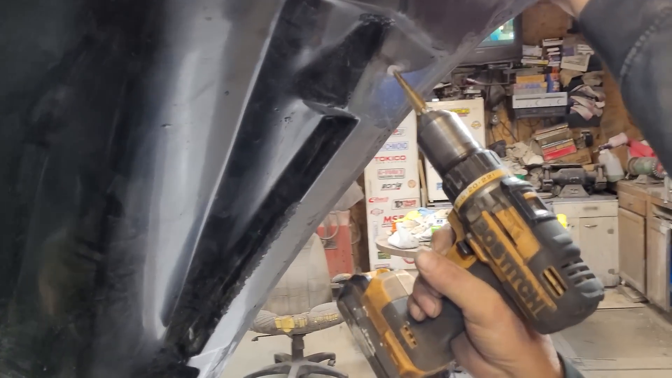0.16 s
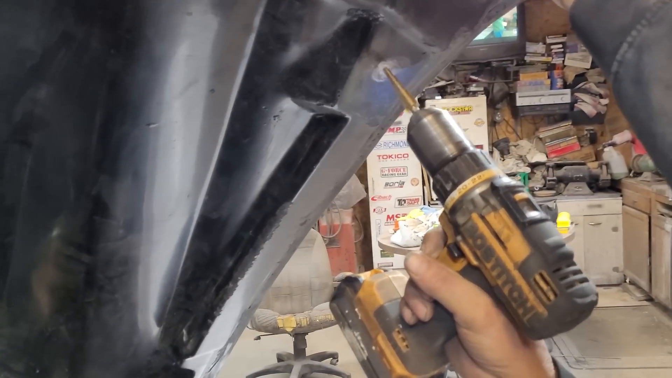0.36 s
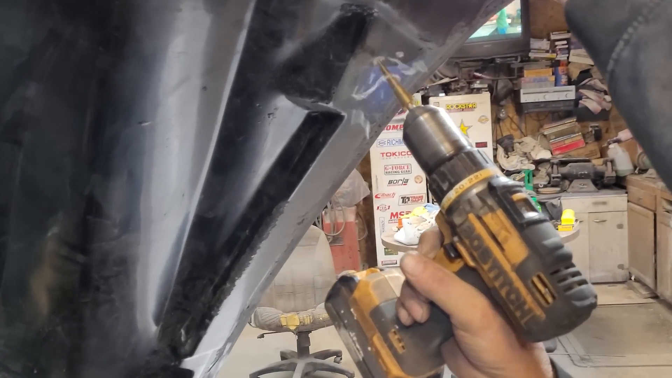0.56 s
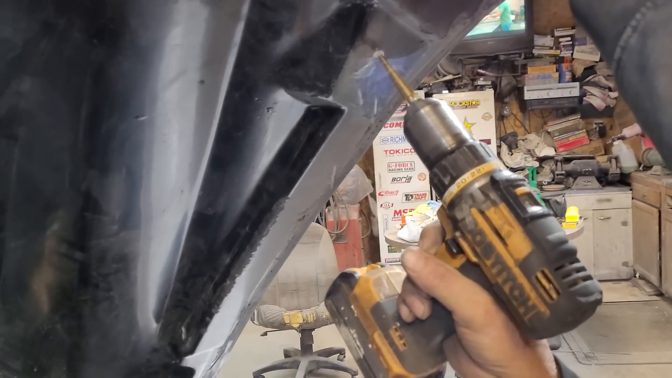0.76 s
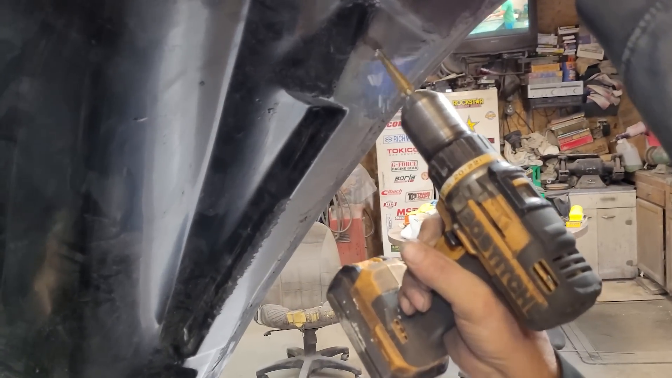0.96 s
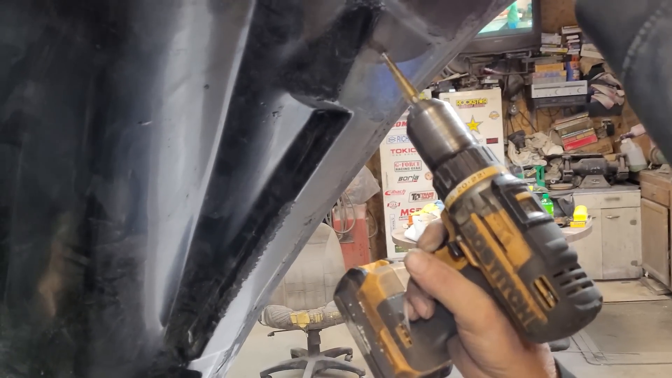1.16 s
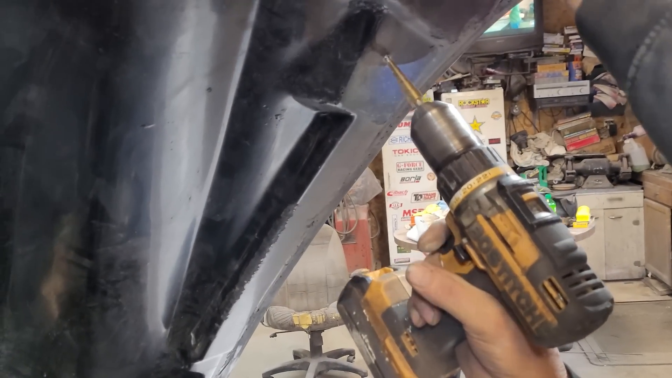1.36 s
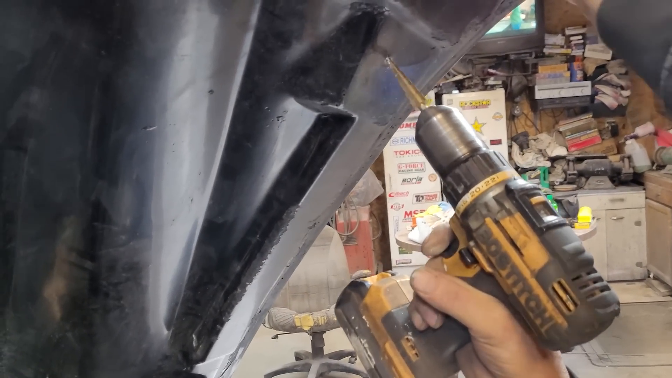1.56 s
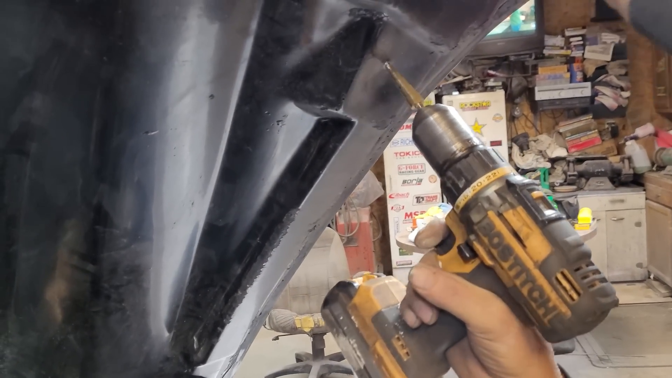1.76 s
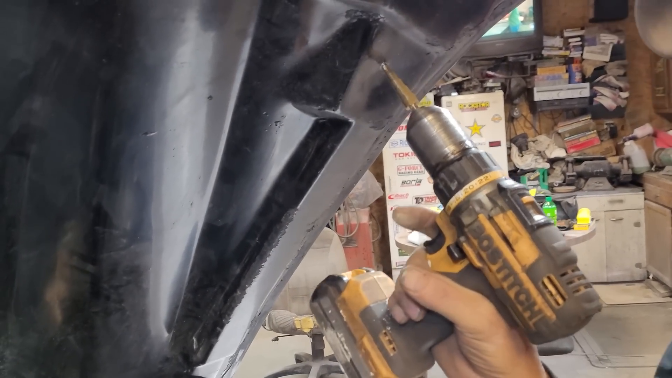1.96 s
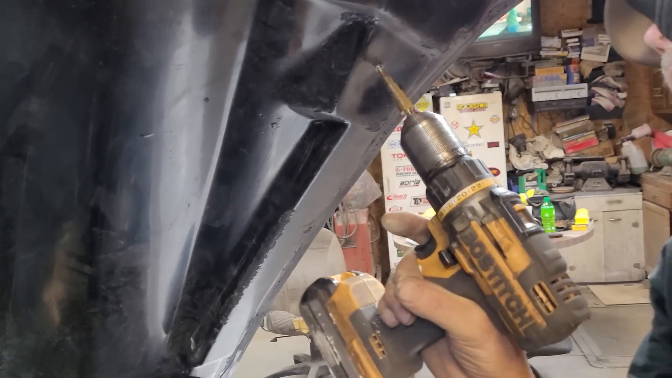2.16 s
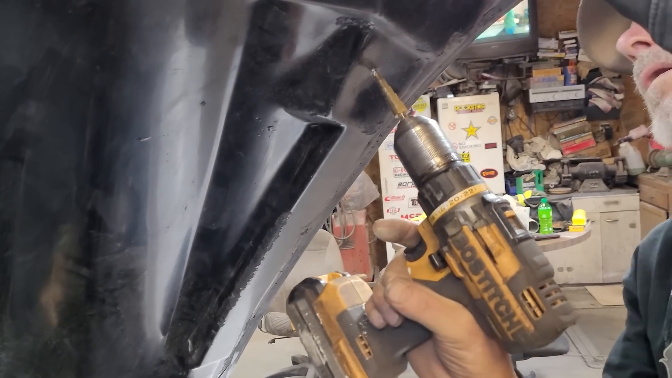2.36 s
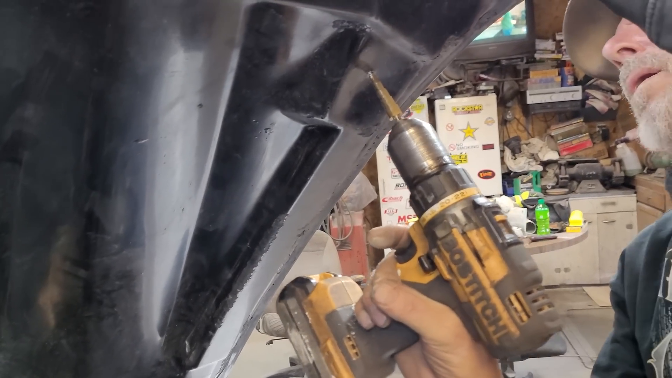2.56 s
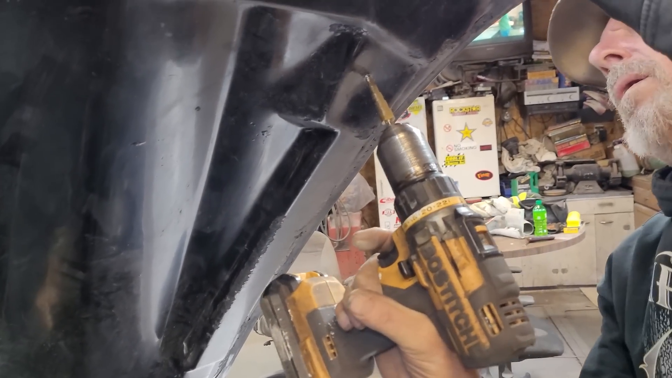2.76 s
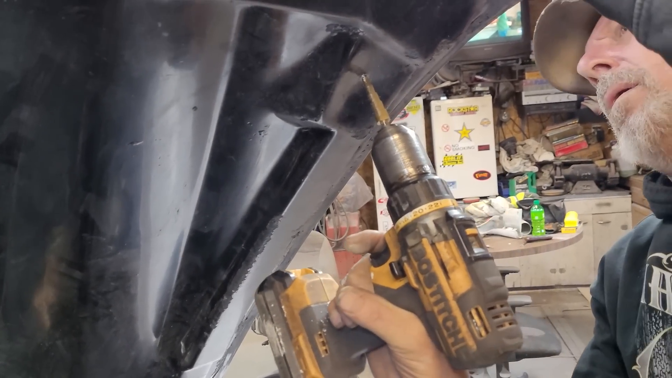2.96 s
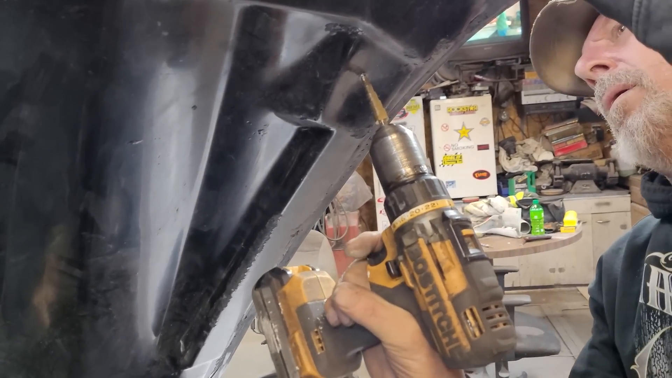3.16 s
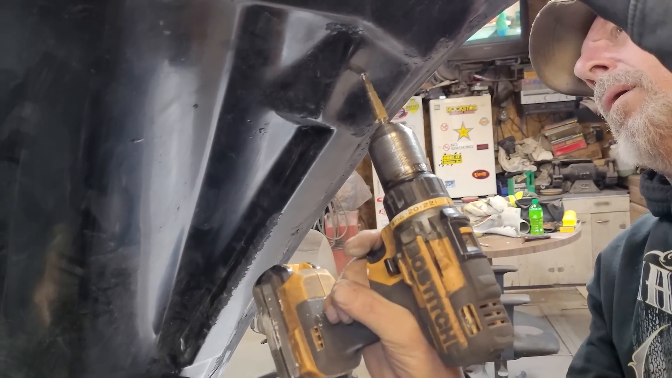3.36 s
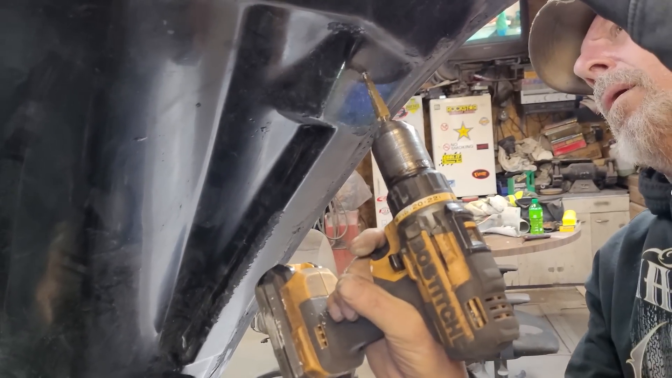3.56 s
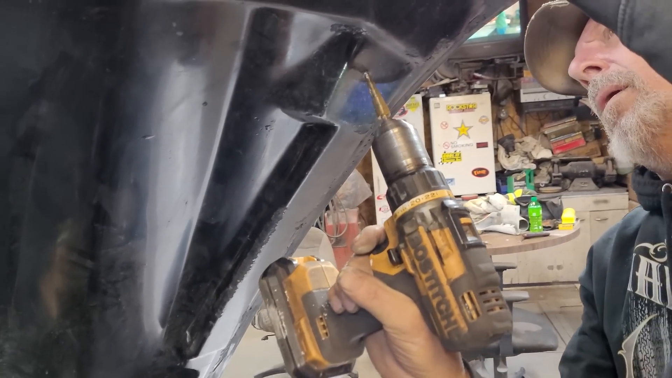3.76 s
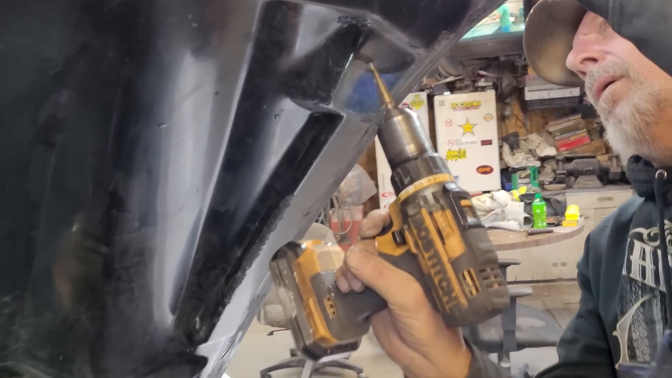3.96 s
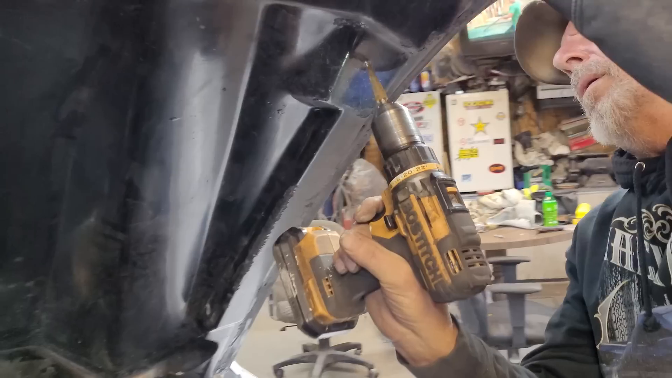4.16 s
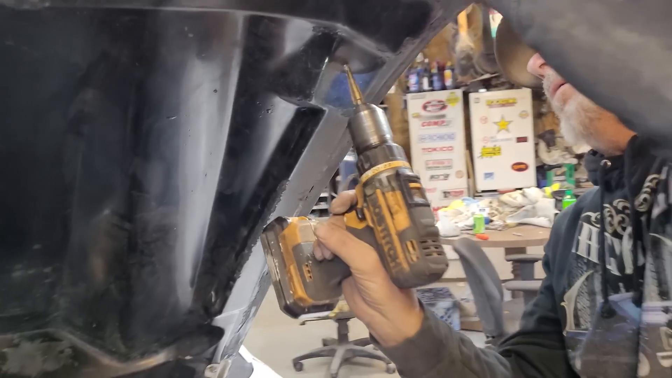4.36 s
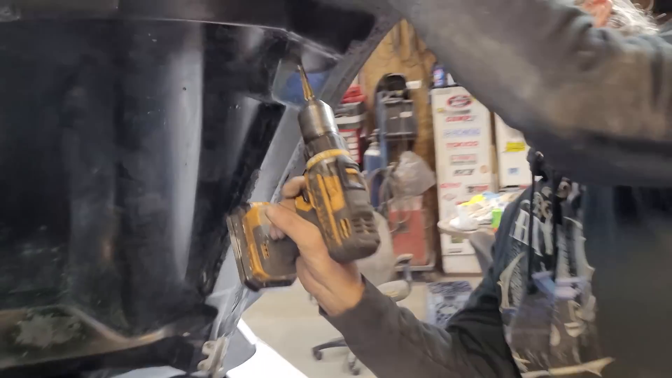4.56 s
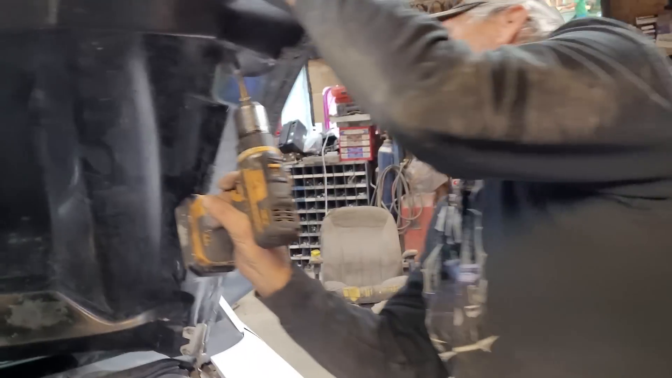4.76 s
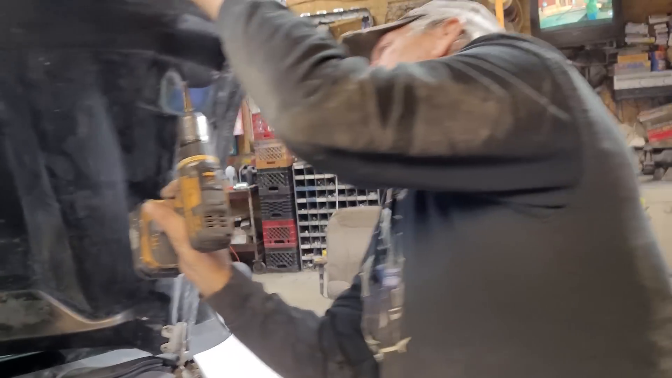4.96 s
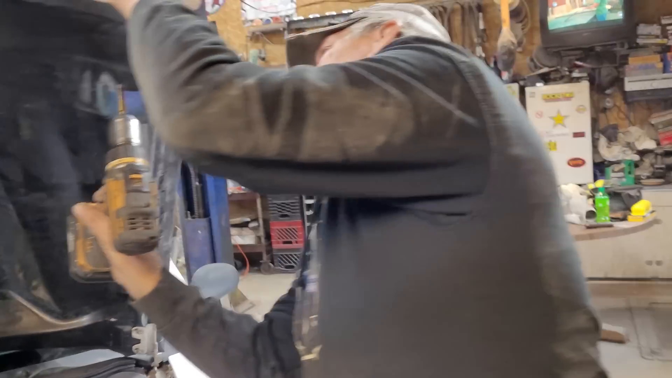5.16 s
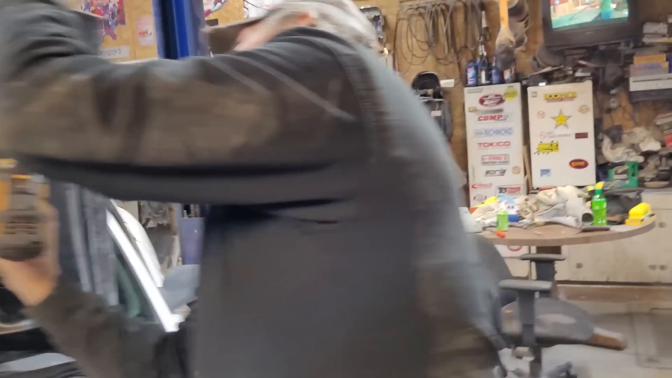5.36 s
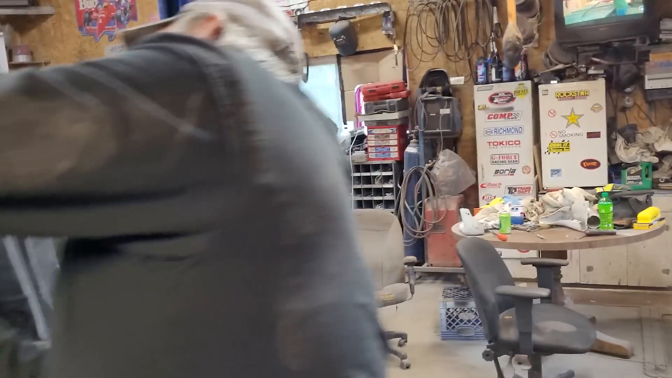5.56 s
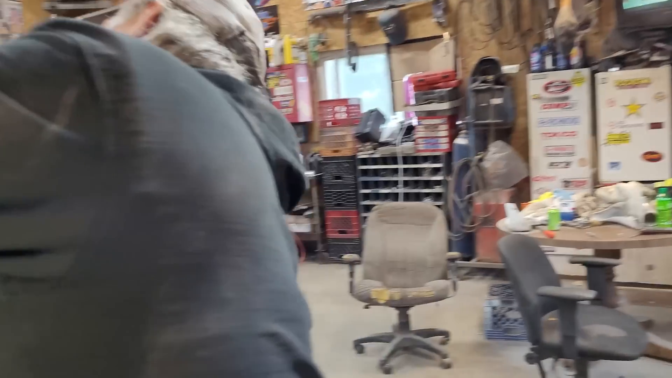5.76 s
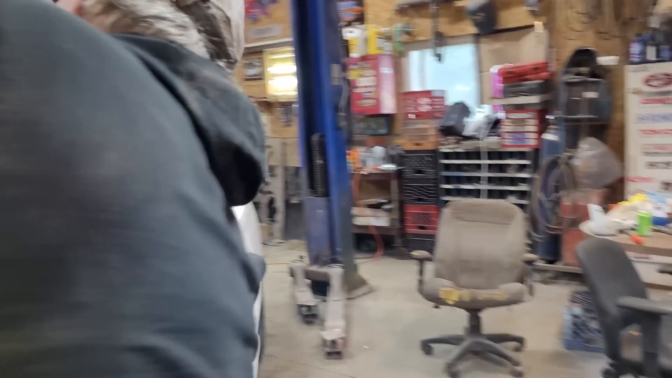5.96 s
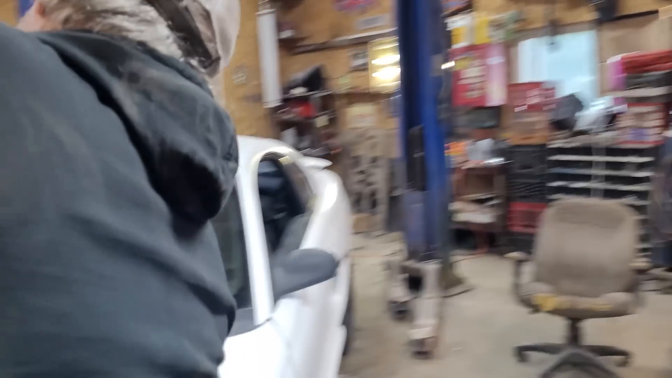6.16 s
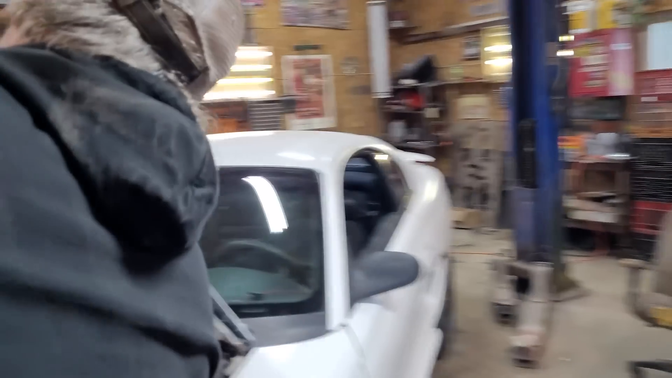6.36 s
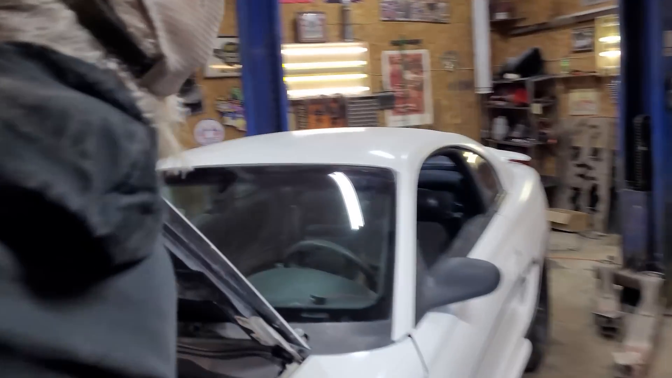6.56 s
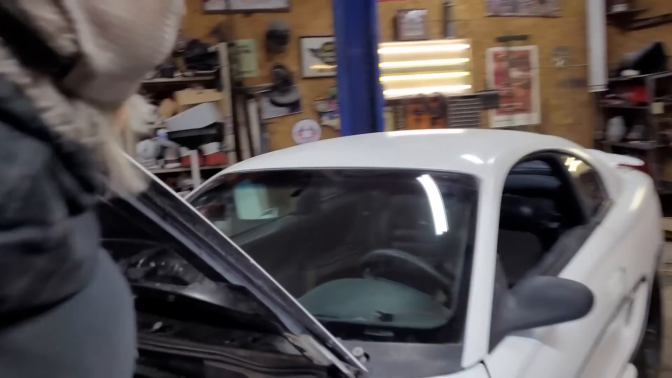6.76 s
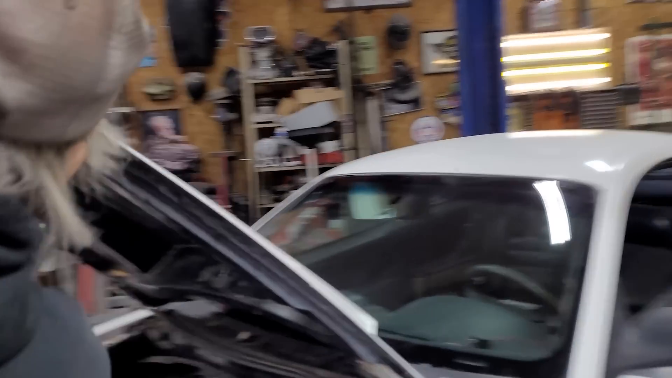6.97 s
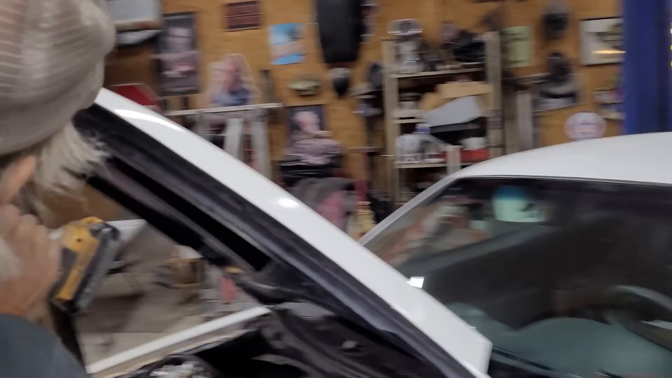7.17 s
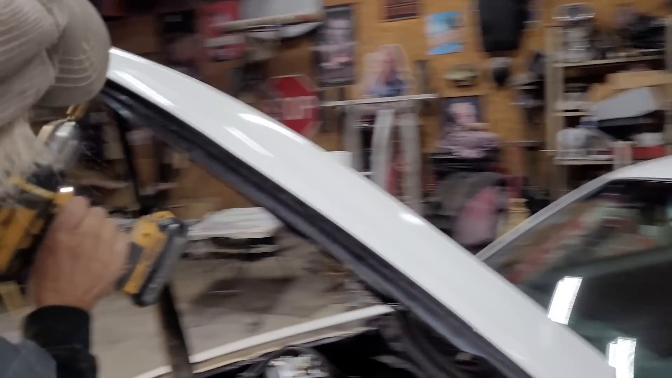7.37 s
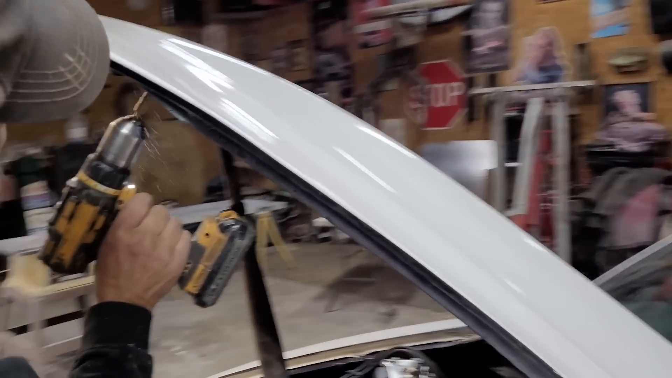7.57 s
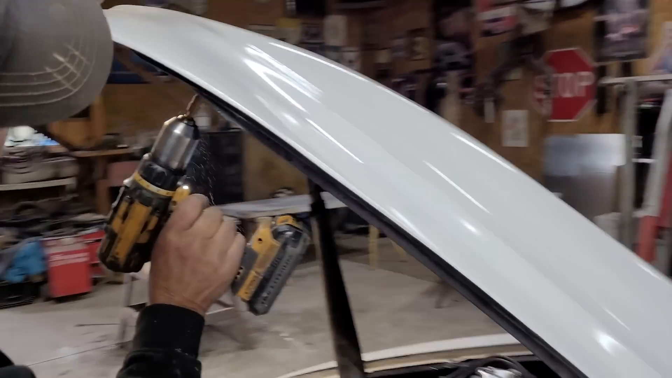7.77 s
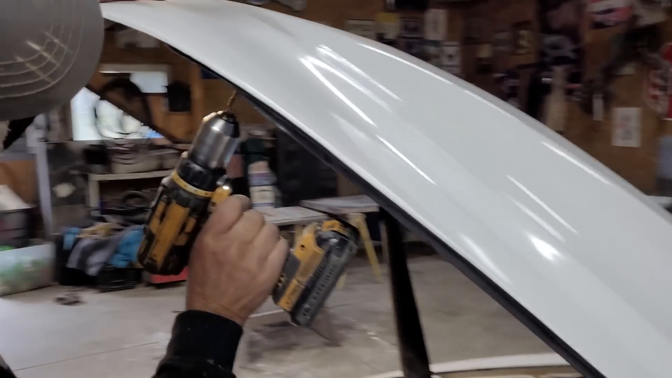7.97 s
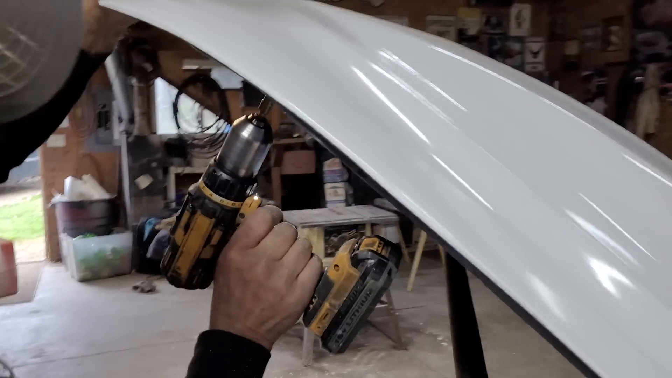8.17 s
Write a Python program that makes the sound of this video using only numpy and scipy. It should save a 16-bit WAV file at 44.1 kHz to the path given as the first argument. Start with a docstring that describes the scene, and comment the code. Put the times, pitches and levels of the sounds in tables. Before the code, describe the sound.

A cordless drill runs at full speed close by in a workshop, its motor and gears whining and hissing while the bit scrapes a steel car hood and sets it droning. Small crunches come near 1 second. From 1.2 seconds the drill winds down, with sharp metallic clacks and panel thumps until about 2 seconds. A quiet stretch follows, with faint scuffs, sleeve rustle, shuffling and a tiny squeak around 3 seconds. At 3.8 seconds the drill restarts slowly with a thin, high electronic tone, the bit rasping and catching. It reaches full speed by 5.5 seconds, and the drone changes colour while the hiss softens as the microphone moves around the car. At 7.6 seconds the bit breaks through with a clack and a short boom, then rubs and chatters in the open hole, still spinning just past 8 seconds.

```python
"""A cordless drill bores holes in the steel hood of a car, close by, in a workshop.
Motor and gears whine, fan and brushes hiss; the bit's two lips scrape the sheet and set it droning.
From 1.2 s the drill runs down with clacks and thumps; faint scuffs, rustling and a squeak follow.
At 3.8 s it restarts slowly, speed control singing, and is at full speed by 5.5 s; the listener walks
round the car. At 7.6 s the bit breaks through with a boom, then rubs and chatters in the open hole."""
import sys
import numpy as np
from scipy import signal
from scipy.fft import rfft, irfft, next_fast_len
from scipy.io import wavfile
from scipy.ndimage import uniform_filter1d

SR = 44100
rng = np.random.default_rng(int(sys.argv[2]) if len(sys.argv) > 2 else 0)


def to_wav(sig):
    """Store sig (one row per channel, or 1-D mono) as 16-bit WAV at the path in sys.argv[1].

    Samples outside -1..1 are clipped; the rate is SR.
    """
    pcm = np.clip(np.atleast_2d(sig), -1, 1) * 32767
    pcm = np.round(pcm).astype(np.int16)
    wavfile.write(sys.argv[1], SR, pcm.T)  # frames by channels


N = 362943
T = np.arange(N) / SR
FULL_WHINE_HZ, WHINE_ORDER, WHINE_CYCLES_PER_LIP = 3900, 12, 90.45
LIP_RASP_DB = 3

# Resonances (frequency [Hz], width [Hz], level [dB])
PANEL_MODES = [(45, 8.9, -14.5), (73.5, 8.4, 0.5), (109.8, 6, 0)]  # whole panel flexing
HOOD_MODES = [(134.8, 2.5, -6), (168.3, 4.2, 1), (211.5, 34, -5), (241, 13, 1.5), (259.4, 12, 9.5),
              (296.4, 24, -1), (324, 10, -3), (392, 3.5, 1.5), (471, 42, -16)]
RIM_MODES = [(510, 43, -5), (534, 39, -5), (577, 9.7, 8), (652, 31, 2.5), (698, 8.5, -6), (770, 32, 1),
             (850, 20, -7), (1055, 12, 4.5)]  # steel round the hole
CHUCK_MODES = [(1450, 30.1, -9), (1543, 24, 3.5), (1734, 16, 0), (1900, 20, 0.5), (2040, 39, 0),
               (2410, 79, -3)]  # bit and chuck
# Noise spectra (frequency [Hz], density [dB])
GEAR_SPECTRUM = [(760, -23.5), (1300, -5), (1470, 1), (1940, 3.5), (3280, -1), (3990, -1.5), (4290, -11),
                 (4600, -24), (5980, -42.5), (10100, -120)]
SCRAPE_SPECTRUM = [(500, -0.5), (700, -1.5), (950, -4), (1200, -0.5), (1500, 0)]
CLACK_SPECTRUM = [(250, -7.5), (420, -8.5), (660, -1), (1100, -8.5), (1450, -5.5), (2200, -5.5),
                  (3000, -9.5), (4200, -12), (6400, -18), (8000, -16), (10000, -22.5), (16000, -12)]
# Aim of the vents (time [s], leftward aim [dB])
VENT_AIM = [(0, 0.5), (1.5, 4.5), (1.7, 4), (4.2, 3), (5.1, 9.5), (5.4, 11), (6.0, 14.5), (7.3, 9.5),
            (8.23, 8.5)]
# Listener's walk (time [s], place [0 below, 1 behind, 2 beside, 3 ahead of the hood])
WALK = [(5.55, 0), (5.95, 1), (6.5, 1), (6.72, 2), (7.3, 2), (7.6, 3)]
# Effort on the second hole (time [s], push on the hood [dB], gear load [dB])
SECOND_HOLE = [(3.84, -45, -52), (3.89, -37.5, -39.5), (4.02, -24.5, -36), (4.55, -22.5, -38.5),
               (5.06, -26, -42), (5.42, -21, -38), (6.0, -27, -41), (7.2, -25.5, -38.5), (7.55, -27, -34.5),
               (7.7, -25, -39), (7.89, -31.5, -39), (8.23, -32, -37)]


def from_db(db):
    """Decibels to gain."""
    return 10 ** (np.asarray(db) / 20)


def unit_rms(x):
    """Scale the channel mean to rms 1."""
    return x / np.sqrt(np.mean(np.atleast_2d(x).mean(0) ** 2) + 1e-20)


def curves(rows):
    """Table columns as curves over time."""
    times_s, *columns = np.transpose(rows)
    return [np.interp(T, times_s, column) for column in columns]


def at_hz(points, hz):
    """Interpolate on a log-frequency axis."""
    points_hz, values = np.transpose(points)
    return np.interp(np.log(hz), np.log(points_hz), values)


def drift(rate_hz):
    """Smooth random curve, rms 1."""
    hop, warm_up = 40, 2000
    pole = np.exp(-2 * np.pi * hop * rate_hz / SR)
    white = rng.standard_normal(N // hop + warm_up + 2)
    slow = signal.lfilter([1], [1, -2 * pole, pole * pole], white)[warm_up:]
    return np.interp(np.arange(N) / hop, np.arange(len(slow)), unit_rms(slow))


def pan(left_db):
    """Stereo gains for a left-minus-right level."""
    return from_db(np.array([[.5], [-.5]]) * left_db)


def lowpass(x, hz, order=2):
    """Butterworth low-pass."""
    return signal.sosfilt(signal.butter(order, hz, fs=SR, output="sos"), x)


def noise(spectrum):
    """Coloured stereo noise with steep skirts; the sides are alike in the bass only."""
    coherence = [(100, 0.72), (300, 0.66), (600, 0.59), (1100, 0.23), (2500, 0.083), (16000, 0.15)]  # (frequency [Hz], left-right likeness [0-1])
    size = next_fast_len(N)
    hz = np.arange(size // 2 + 1) * SR / size + 1
    mid, side = rfft(rng.standard_normal((2, size)))
    alike = np.clip(at_hz(coherence, hz), 0, 1)
    skirts = np.minimum(1, np.minimum(hz / spectrum[0][0], spectrum[-1][0] / hz)) ** 8
    pair = np.sqrt(1 + alike) * mid + np.sqrt(1 - alike) * side * [[1], [-1]]
    return unit_rms(irfft(pair * skirts * from_db(at_hz(spectrum, hz)), size)[:, :N])


def grains(spectrum, depth_db, rate_hz):
    """Noise with a randomly flickering level."""
    return unit_rms(noise(spectrum) * from_db(depth_db * drift(rate_hz)))


def tone(cycles, waver, rate_hz):
    """Sine whose level and phase waver on each side as reflections shift."""
    a, b = waver * drift(rate_hz), waver * drift(rate_hz)
    angle = 2 * np.pi * cycles
    return unit_rms(np.array([(1 + a) * np.cos(angle + b), (1 + b) * np.sin(angle - a)]))


def resonate(force, modes):
    """Response of parallel two-pole resonances to a force."""
    out = 0
    for hz, width_hz, db in modes:
        r = np.exp(-np.pi * width_hz / SR)
        poles = [1, -2 * r * np.cos(2 * np.pi * hz / SR), r * r]
        out = out + from_db(db) * signal.lfilter([(1 - r * r) / 2, 0, (r * r - 1) / 2], poles, force + 1e-18)
    return out


def swells(rows, rise_s, fall_s):
    """Rise-hold-fall envelopes; rise and fall times are per 20 dB."""
    return sum(from_db(db - 20 * np.maximum(start_s - T, 0) / rise_s
                       - 20 * np.maximum(T - start_s - hold_s, 0) / fall_s)
               for start_s, hold_s, db in rows) + 1e-12


def ripple(cycles, depth_db):
    """Gain that pulses once a cycle."""
    return from_db(depth_db * np.cos(2 * np.pi * cycles))


def steadied(x, span_s=0.088):
    """Even out slow swells, as under a firm hand."""
    return x / np.sqrt(uniform_filter1d(x.mean(0) ** 2, int(span_s * SR)) + 1e-12)


def effort(kind, release_db_per_s):
    """Gain of "push" or "load" over both holes: quick start, steady release."""
    first_hole = [(0, -31.5, -30), (.5, -26.5, -29.5), (1.05, -22, -29.5), (1.2, -25, -34),
                  (1.48, -40, -37), (1.55, -19.5, -37), (1.67, -26.5, -40.5), (1.77, -26, -40.5)]  # (time [s], push on the hood [dB], gear load [dB])
    attack_db_per_s, gain = 898, 1e-12
    for rows in (first_hole, SECOND_HOLE):
        db = curves(rows)[("push", "load").index(kind)]
        before_s, after_s = np.maximum(rows[0][0] - T, 0), np.maximum(T - rows[-1][0], 0)
        gain = gain + from_db(db - attack_db_per_s * before_s - release_db_per_s * after_s)
    return gain


def ahead():
    """How far the listener has come round to the front, 0-1."""
    return np.clip(curves(WALK)[0] - 2, 0, 1)


def screening(from_s=5.807, to_s=7.81, edge_s=0.54):
    """How far the worker's body hides the drill, 0-1."""
    return np.clip(np.minimum(T - from_s, to_s - T) / edge_s, 0, 1)


def motor(rotor, whine_db, load, wander_db=1.2):
    """Whine and weaker tones locked to the rotor; their mix differs in front of the car."""
    side_tones = [(5.75, -18.5, -25), (7.4, -23, -34), (9, -25, -29), (11, -19.5, -15), (13, -21, -17)]  # (rotor order, level below the hood [dB], level ahead [dB])
    whine_gain = from_db(whine_db + wander_db * drift(22))
    whine = whine_gain * tone(WHINE_ORDER * rotor, waver=.38, rate_hz=26) * pan(1)
    front = ahead()
    sides = sum(from_db(below_db + front * (ahead_db - below_db)) * tone(k * rotor, waver=1, rate_hz=6.4)
                for k, below_db, ahead_db in side_tones)
    return whine + load * sides


def gears(pulse, lips, speed, load):
    """Teeth grind and ring the chuck; each resonance comes and goes as the bit leans."""
    wander_db, chuck_db = 4.5, -14 - 14 * screening()
    grind = unit_rms(noise(GEAR_SPECTRUM) * pulse * lip_rasp(lips, speed))
    chuck = unit_rms(sum(from_db(wander_db * drift(2.7)) * resonate(grind, [m]) for m in CHUCK_MODES))
    return load * (from_db(-3) * grind + from_db(chuck_db) * chuck) * pan(-1.7)


def fan(pulse, tones, speed, aim_db):
    """Air and tones beam from the vents, which face away from the front of the car."""
    air_spectrum = [(2530, -21), (4300, 0), (4610, -3), (5040, 0), (6230, -5), (7700, -3), (8560, -12),
                    (9590, -27), (10000, -10.5), (13000, -35.5), (22000, -120)]  # (frequency [Hz], density [dB])
    level_db = -8.85 + 0.38 * aim_db - 7.5 * screening() - 3.5 * ahead()
    gain = effort("load", release_db_per_s=230) * speed ** 0.15 * from_db(level_db)
    return gain * steadied(unit_rms(noise(air_spectrum) * pulse) + tones) * pan(0.78 * aim_db)


def brushes(pulse, buzz, surge, aim_db):
    """Brushes hiss and buzz through the vents, louder under torque."""
    hiss_spectrum = [(5760, -33), (9800, -2.5), (10500, 2.5), (14700, 2.5), (15100, 9), (16000, -12)]  # (frequency [Hz], density [dB])
    level_db = -4 + 0.22 * aim_db - 8 * screening() + 3 * surge
    gain = effort("load", release_db_per_s=350) * from_db(level_db)
    return gain * steadied(unit_rms(noise(hiss_spectrum) * pulse) + buzz) * pan(0.76 * aim_db)


def drive_train(rotor, lips, speed, load):
    """Gears, fan and brushes pulse together; their tones stand out at speed and under torque."""
    brush_orders = [(31, -21), (32, -22.5), (33, -18), (34, -21.5), (36, -15.5), (37, -21), (38, -21.5),
                    (39, -15.5), (40, -15), (41, -21), (42, -20.5), (43, -15), (44, -21), (45, -17),
                    (47, -15.5), (48, -15.5)]  # (rotor order, level [dB])
    gear_fan_orders = [(14, -16.5), (15, -11), (16, -20.5), (18, -17.5), (20, -21), (21, -20.5),
                       (22, -19.5), (23, -21), (24, -13.5), (26, -24), (27, -19.5), (28, -25), (30, -23.5)]  # (rotor order, level [dB])
    surges = [(5.39, 0.1703, -5)]  # (time [s], hold [s], share of full torque [dB])
    pulse = ripple(lips, depth_db=-0.95) * from_db(drift(250))
    aim_db = curves(VENT_AIM)[0]
    surge = np.minimum(swells(surges, rise_s=0.27, fall_s=0.31), 1)
    rotor_hz = speed * FULL_WHINE_HZ / WHINE_ORDER
    sing = from_db(.3 * aim_db + 4 * surge - 5 * screening() - 1) * np.minimum(rotor_hz / 290, 1) ** 3
    shaken = rotor + .004 * surge * drift(90)  # play in the gears
    buzz, tones = (sing * sum(from_db(db) * tone(k * shaken, waver=0.91, rate_hz=13) for k, db in orders)
                   for orders in (brush_orders, gear_fan_orders))
    grind = gears(pulse, lips, speed, load)
    vented = fan(pulse, tones, speed, aim_db) + brushes(pulse, buzz, surge, aim_db)
    return grind + arm_reflection(vented)


def lip_rasp(lips, speed):
    """Gain that peaks as each lip digs in, harder at low speed."""
    dig = np.cos(np.pi * lips) ** 8
    return from_db(LIP_RASP_DB / np.maximum(speed, .75) * (dig - dig.mean()))


def drone(lips, waver_db=1.6):
    """Even cuts ring the sheet at multiples of the lip rate; each place hears its own mix."""
    # Mix at each place (lip order, level [dB])
    below = [(1, -20), (2, -12.5), (3, -17), (4, -6.5), (5, -16.5), (6, 5.5), (7, -15), (8, -1.5),
             (9, -6.5), (10, -16), (11, -18), (12, -15.5), (13, -18), (14, -16.5), (15, -18), (16, -19.5)]
    behind = [(1, -9), (2, -27), (3, -9.5), (4, 0.5), (5, -3), (6, -11.5), (7, 0), (8, -2), (9, 3.5),
              (10, -2.5), (11, -5), (12, -3), (13, -10), (14, -3.5), (15, -7.5), (16, -12), (17, -13),
              (18, -12), (19, -18), (20, -28)]
    beside = [(1, -18), (2, -32), (3, -13), (4, -14), (5, -9), (6, 1.5), (7, -13), (8, 1), (9, -6),
              (10, -10), (11, -15), (12, -7.5), (13, -18), (14, -26), (15, -17), (16, -15), (17, -25),
              (18, -14), (19, -21), (20, -16)]
    in_front = [(1, -18), (2, -13), (3, -7.5), (4, -6.5), (5, -3.5), (6, -0.5), (7, -2.5), (8, -5.5),
                (9, -10), (10, -6), (11, -8), (12, -24), (17, -7)]
    note_swells = [(5.47, .11, 4, 0), (5.45, 0.14, 8, -4.5), (5.63, 0.16, 10, -2), (5.75, 0.22, 9, -6),
                   (5.719, 0.06, 6, 0), (6.201, 0.3, 10, -2), (6.45, 0.19, 11, -7), (6.05, 0.39, 12, -6),
                   (6.72, 0.38, 6, -3.5), (6.7, 0.28, 8, -5), (6.84, 0.13, 10, -3), (6.96, 0.16, 12, -7),
                   (7.02, .1, 9, -8), (7.1, .27, 5, -8), (7.219, 0.24, 4, -1.5), (7.3, 0.11, 7, -4),
                   (7.53, 0.25, 8, 3), (7.93, .3, 7.5, 5.5)]  # (time [s], hold [s], lip order, level [dB])
    place = curves(WALK)[0]
    cycles, out = lips + .01 * drift(3.9), 0
    for k in [*range(1, 21), 7.5]:
        place_db = [dict(mix).get(k, -30) for mix in (below, behind, beside, in_front)]
        notes = [(start_s, hold_s, db) for start_s, hold_s, order, db in note_swells if order == k]
        gain = from_db(np.interp(place, range(4), place_db)) + swells(notes, rise_s=.13, fall_s=.13)
        gain = gain * from_db(waver_db * drift(4.3))
        angle = 2 * np.pi * (k * cycles + rng.random() + .02 * drift(3))
        spread_rad = np.array([[1], [-1]]) * rng.normal() * k * .03
        out = out + gain * np.cos(angle + spread_rad)
    return steadied(out, span_s=0.24)


def cutting(lips, speed, load):
    """A fast bit cuts evenly and drones; slow or grabbing, it tears chips that shake the sheet and rasp."""
    grabs = [(.03, 0.069, -66), (.99, 0.058, -20), (1.73, 0.018, -39), (4.0, 0.019, -35.5),
             (4.19, 0.086, -40), (4.52, 0.13, -36), (5.3, 0.65, -48), (7.63, 0.19, -40)]  # (time [s], hold [s], level [dB])
    push, grab = effort("push", release_db_per_s=60), swells(grabs, rise_s=0.15, fall_s=0.19)
    best_evenness = np.where(T < SECOND_HOLE[0][0], 0.44, 0.78)
    evenness = np.clip(best_evenness * speed ** 4.8 / (1 + 30 * (grab / push) ** 2), 0, .98)
    bite = from_db(2 * drift(120))
    tearing = lowpass(bite * (rng.standard_normal(N) + 0.3 * rng.standard_normal((2, N))), hz=2160)
    flex_gain = from_db(-6.5) * (from_db(-18.5) * push + grab)
    flex = flex_gain * steadied(resonate(tearing, PANEL_MODES), span_s=0.04)
    rumble = steadied(resonate(tearing, HOOD_MODES))
    body = push * from_db(0.57) * (np.sqrt(evenness) * drone(lips) + np.sqrt(1 - evenness) * rumble)
    rasp = unit_rms(noise(SCRAPE_SPECTRUM) * bite * lip_rasp(lips, speed))
    rim = from_db(-3) * np.sqrt(1 - .9 * evenness) * unit_rms(resonate(rasp, RIM_MODES))
    scrape_gain = load * from_db(0.5) * speed ** -0.067 + from_db(-6.5) * grab
    return (flex + body) * pan(-1.1) + scrape_gain * (rim * pan(1.1) + from_db(-10) * rasp * pan(-9))


def hood_delay(sheet):
    """The hood is on the left, so the right side hears it later."""
    right_lag = [(.3, .00002), (1.2, .0004), (1.8, 0.00028), (2.6, 0), (4.8, 0.0002), (5.7, 0.00023),
                 (6.3, 0.00039), (7, 0), (8.23, 0.000043)]  # (time [s], lag [s])
    left, right = sheet
    return np.array([left, np.interp(T - curves(right_lag)[0], T, right)])


def room_tone(line_hz=15733):
    """Faint room noise; a picture tube whistles at its line rate."""
    room_spectrum = [(30, -3.5), (75, 1), (180, -11.5), (250, -4.5), (630, -16), (1400, -17), (2800, -28.5),
                     (12000, -30.5), (15000, -35)]  # (frequency [Hz], density [dB])
    return from_db(-72) * noise(room_spectrum) + from_db(-68.5) * tone(line_hz * T, waver=.45, rate_hz=8)


def catches(rise_s=0.0019, t20_s=0.045):
    """Short crunches as a lip catches and tears off the burr."""
    crunches = [(.854, -31), (.889, -32), (.986, -21.5), (1.081, -24.5), (4.015, -34.5), (4.152, -32),
                (4.183, -33), (4.475, -33), (4.522, -35), (4.553, -33), (4.631, -36), (4.668, -39),
                (4.948, -40)]  # (time [s], level [dB])
    crunch_spectrum = [(500, -2), (1300, -3), (2500, -3), (3700, -6.5)]  # (frequency [Hz], density [dB])
    bursts = sum(from_db(db - 20 * np.maximum(T - start_s - rise_s, 0) / t20_s)
                 * np.clip((T - start_s) / rise_s, 0, 1) for start_s, db in crunches)
    return bursts * grains(crunch_spectrum, depth_db=2.5, rate_hz=400)


def speed_control(hz=4104):
    """The speed control sings while the trigger is half pressed."""
    levels = [(1.1, -100), (1.2, -53), (1.35, -53), (1.6, -110), (3.798, -100), (3.81, -46), (3.9, -37),
              (4.1, -35.5), (4.26, -38.5), (4.45, -50.5), (4.88, -51.5), (4.95, -40), (5.15, -54),
              (5.7, -110)]  # (time [s], level [dB])
    return from_db(curves(levels)[0]) * tone(hz * T, waver=0.12, rate_hz=42) * pan(5.8)


def clacks():
    """The bit snags: steel knocks on steel and rings the chuck and the rim of the hole. Softer clicks follow as
    the drill is handled in the pause and as the trigger is pressed at the restart."""
    clack_events = [(1.5119, -14.5, 0.0012, 0.033, 15100), (1.5148, -16, 0.00045, 0.015, 15000),
                    (1.524, -22, 0.00085, 0.019, 9000), (1.625, -12.5, 0.0014, 0.021, 15100),
                    (1.631, -19, 0.0011, 0.032, 11900), (1.76, -24, 0.0043, 0.037, 2510),
                    (1.784, -21, 0.0033, 0.019, 15000), (1.98, -39, 0.0018, 0.055, 1570),
                    (2.555, -51, .002, 0.045, 1600), (3.809, -50, .002, 0.063, 3000),
                    (3.831, -33, 0.0012, 0.067, 2500), (7.568, -11.5, .002, 0.031, 1200),
                    (7.577, -20, 0.0017, 0.038, 1480), (7.625, -21, 0.0022, 0.041, 900)]  # (time [s], level [dB], rise [s], 30 dB decay [s], low-pass [Hz])
    grit, knocks = grains(CLACK_SPECTRUM, depth_db=1, rate_hz=400), np.zeros((2, N))
    t = T[:SR // 3]
    for start_s, db, rise_s, t30_s, top_hz in clack_events:
        span = slice(round(start_s * SR), round(start_s * SR) + len(t))
        burst = from_db(db - 30 * np.maximum(t - rise_s, 0) / t30_s) * np.minimum(t / rise_s, 1)
        knocks[:, span] += lowpass(burst * grit[:, span], top_hz)
    chuck = from_db(-1.5) * resonate(knocks, CHUCK_MODES)
    rim = from_db(-4.5) * resonate(knocks.mean(0), RIM_MODES)
    return (knocks + chuck + rim) * pan(0.77)


def thumps():
    """The sheet springs or is bumped: half-sine pushes, duller with longer contact."""
    bumps = [(1.519, -18, 0.00054), (1.546, -13, 0.00057), (1.724, -16.5, 0.003), (1.84, -22, 0.0025),
             (1.981, -23, 0.0015), (2.025, -23, 0.004), (2.309, -39, 0.004), (2.559, -43, 0.0052),
             (3.38, -50, 0.019), (3.41, -43, 0.017), (7.57, -12.5, 0.00024), (7.578, -12, 0.0033),
             (7.625, -19, 0.0026), (7.657, -19.5, 0.0051)]  # (time [s], peak [dB], contact [s])
    out = np.zeros(N)
    for start_s, db, contact_s in bumps:
        force = np.sin(np.pi * np.minimum(T[:SR // 2] / contact_s, 1))
        ring = resonate(force, PANEL_MODES + HOOD_MODES + RIM_MODES)
        at = round(start_s * SR)
        out[at:at + len(ring)] += (from_db(db) * ring / np.abs(ring).max())[:N - at]
    return out * pan(-1)


def workshop(x, wet_db=-8, t60_s=0.42):
    """Add a diffuse stereo tail, dulled by the clutter."""
    t = T[:SR * 3 // 4]
    tail = rng.standard_normal((2, len(t))) * from_db(-60 * t / t60_s) * (t > .006)
    tail = lowpass(tail / np.sqrt(np.sum(tail[0] ** 2)), hz=6000, order=1)
    return x + from_db(wet_db) * signal.fftconvolve(x, tail, axes=1)[:, :N]


def scuffs():
    """The drill slides softly as it is drawn back and set down."""
    slides = [(1.968, 0.0078, -47.5), (2.13, 0.012, -47), (2.24, 0.051, -54.5), (2.635, 0.045, -56)]  # (time [s], hold [s], level [dB])
    return swells(slides, rise_s=0.051, fall_s=0.047) * grains(CLACK_SPECTRUM, depth_db=2, rate_hz=200)


def rustling():
    """Thin, high rustle of a sleeve."""
    rustles = [(2.25, 0.38, -77)]  # (time [s], hold [s], level [dB])
    cloth_spectrum = [(4000, 0.5), (7500, 1), (11000, -5), (14000, -5.5)]  # (frequency [Hz], density [dB])
    return swells(rustles, rise_s=.2, fall_s=0.74) * noise(cloth_spectrum)


def shuffling():
    """Soft, grainy shuffling stirs up a faint ring."""
    shuffles = [(2.54, 0.029, -56.5), (2.72, 0.074, -59.5), (3.62, 0.081, -76)]  # (time [s], hold [s], level [dB])
    shuffle_spectrum = [(120, -25), (200, -6), (248, 0.5), (343, -10), (822, -1), (1160, -9), (1340, -9),
                        (1690, -16), (2500, -18), (3500, -30), (4550, -25), (7700, -120)]  # (frequency [Hz], density [dB])
    ring_modes = [(1323, 58, -5), (1923, 90, -4), (2556, 130, -10)]  # (frequency [Hz], width [Hz], level [dB])
    grit = grains(shuffle_spectrum, depth_db=2, rate_hz=60)
    ring = from_db(-7.5) * unit_rms(resonate(grit, ring_modes))
    return swells(shuffles, rise_s=0.16, fall_s=0.37) * (grit + ring) * pan(-3.5)


def squeak(top_hz=935, sag_hz=45.3, edge_s=0.11):
    """A thin squeak that arches in pitch."""
    squeaks = [(3.06, 0.108, -68.5)]  # (time [s], hold [s], level [dB])
    start_s, hold_s, _ = squeaks[0]
    hz = top_hz - sag_hz * np.minimum(((T - start_s - hold_s / 2) / edge_s) ** 2, 2)
    return swells(squeaks, edge_s, edge_s) * tone(np.cumsum(hz) / SR, waver=0.64, rate_hz=42) * pan(-3.5)


def arm_reflection(x):
    """An echo off the raised arm; its shrinking detour sweeps a comb up through the treble."""
    detour = [(4.9, .00052, 0), (5.15, .00049, .35), (5.35, .000445, .35), (5.55, .000402, .4),
              (5.8, .000385, .4), (6.25, .000372, 0)]  # (time [s], delay [s], strength [0-1])
    delay_s, strength = curves(detour)
    echo = np.array([np.interp(T - delay_s, T, side) for side in x])
    return (x + strength * echo) / np.sqrt(1 + strength ** 2)


def grating(lips, width_hz=220, edge_s=0.19):
    """The leaning bit grates in a narrow band, pulsing with the lips."""
    grates = [(5.18, 0.19, -46.5, 2602), (5.6, .3, -47.5, 1950), (6.3, 0.52, -48, 2370)]  # (time [s], hold [s], level [dB], pitch [Hz])
    force = noise(GEAR_SPECTRUM) * ripple(lips, LIP_RASP_DB)
    return sum(swells([event], edge_s, edge_s) * unit_rms(resonate(force, [(hz, width_hz, 0)]))
               for *event, hz in grates)


def rubbing():
    """The flank of the bit rubs in the widening hole."""
    rubs = [(7.55, 0.18, -41), (8.1, .12, -50)]  # (time [s], hold [s], level [dB])
    rub_spectrum = [(4500, 6.5), (4900, 1), (5600, 0)]  # (frequency [Hz], density [dB])
    return swells(rubs, rise_s=0.9974, fall_s=0.74) * noise(rub_spectrum)


def breakthrough(start_s=7.573, level_db=-7, hz=339, rise_s=0.0059):
    """The freed steel booms: it swings up in a few cycles, drops fast, then rings on."""
    drop_t60_s, tail_t60_s, tail_db = 0.094, 1, -19
    t = np.maximum(T - start_s, 0)
    past_peak_s = np.maximum(t - rise_s, 0)
    fall = from_db(-60 * past_peak_s / drop_t60_s) + from_db(tail_db - 60 * past_peak_s / tail_t60_s)
    return from_db(level_db) * np.minimum(t / rise_s, 1) * fall * np.sin(2 * np.pi * hz * t)


def chattering(rotor, lips, gear_order=9):
    """Each lip catches and rings the edge of the open hole; the loaded gears sing."""
    chatters = [(8.1, 0.1203, -36.5)]  # (time [s], hold [s], level [dB])
    edge_modes = [(787, 62, 2), (976, 37, 7.5), (1330, 55, -1.5), (1610, 30.2, -1), (1837, 66, -4)]  # (frequency [Hz], width [Hz], level [dB])
    bites = noise(SCRAPE_SPECTRUM) * ripple(lips, depth_db=10)
    gear_tone = from_db(-11) * tone(gear_order * rotor, waver=0.33, rate_hz=8)
    return swells(chatters, rise_s=0.37, fall_s=.3) * (unit_rms(resonate(bites, edge_modes)) + gear_tone)


def scene():
    """One speed curve drives motor, gears and bit."""
    # Motor whine (time [s], pitch [Hz], level [dB])
    run_down = [(0, 3939, -34), (.28, 3920, -42), (1.14, 3930, -41.5), (1.24, 3657, -39), (1.35, 3585, -51),
                (1.39, 3478, -42), (1.49, 3058, -39), (1.66, 2327, -42.5), (1.75, 2020, -39.5),
                (1.93, 1000, -105)]
    slow_start = [(3.8, 699, -100), (3.93, 1312, -47), (3.956, 1507, -42), (3.99, 1690, -36),
                  (4.03, 1823, -48), (4.072, 1940, -40), (4.19, 2138, -37), (4.35, 2293, -41),
                  (4.57, 2364, -39), (4.73, 2296, -48), (4.92, 2245, -51), (5.0, 2343, -54),
                  (5.07, 2584, -49), (5.14, 2783, -62)]
    full_speed = [(5.28, 3223, -56), (5.35, 3529, -44.5), (5.44, 3813, -35.5), (5.49, 3854, -45),
                  (5.65, 3901, -45), (5.729, 3912, -37.5), (5.82, 3886, -51), (5.92, 3912, -43.5),
                  (6.11, 3905, -40.5), (6.16, 3901, -50), (6.38, 3938, -49), (6.7, 3895, -42.5),
                  (6.92, 3915, -51.5), (6.972, 3924, -35), (7.111, 3871, -44), (7.29, 3903, -35.5),
                  (7.57, 3846, -36), (7.83, 4012, -45), (7.94, 4000, -37.5), (8.12, 3970, -52),
                  (8.23, 3990, -42)]
    whine_hz, whine_db = curves(run_down + slow_start + full_speed)
    whine_hz = whine_hz * (1 + .0012 * drift(18))
    speed, whine_cycles = whine_hz / FULL_WHINE_HZ, np.cumsum(whine_hz) / SR
    rotor, lips = whine_cycles / WHINE_ORDER, whine_cycles / WHINE_CYCLES_PER_LIP  # phases [cycles]
    load = effort("load", release_db_per_s=137)
    drill = motor(rotor, whine_db, load) + drive_train(rotor, lips, speed, load) + speed_control()
    room = room_tone()
    sheet = hood_delay(cutting(lips, speed, load) + workshop(thumps()) + breakthrough())
    bit = catches() + grating(lips) + rubbing() + chattering(rotor, lips)
    handling = workshop(clacks() + scuffs()) + shuffling() + squeak() + rustling()
    return drill + room + sheet + bit + handling


def record(dry, low_cut_hz=34, high_cut_hz=15850):
    """Cut the deepest bass, round the peaks, cut the top."""
    thin = signal.sosfilt(signal.butter(3, low_cut_hz, "high", fs=SR, output="sos"), dry)
    rounded = 1.292 * np.tanh(thin / 1.353)
    return signal.sosfilt(signal.ellip(12, .1, 80, high_cut_hz, fs=SR, output="sos"), rounded)


dry = scene()
out = record(dry)
to_wav(out)
```